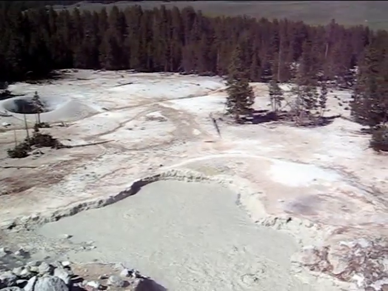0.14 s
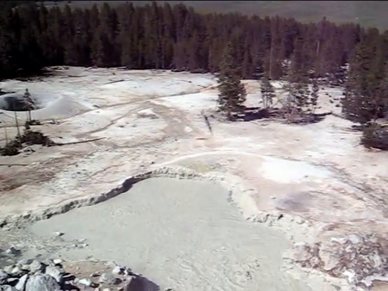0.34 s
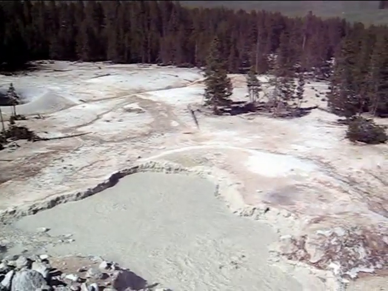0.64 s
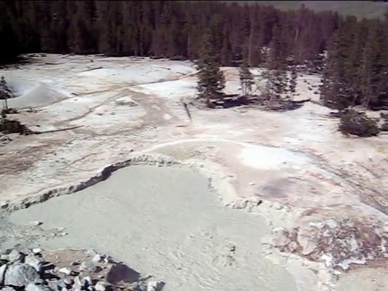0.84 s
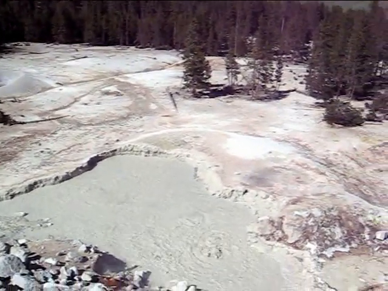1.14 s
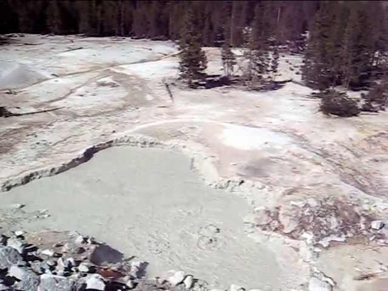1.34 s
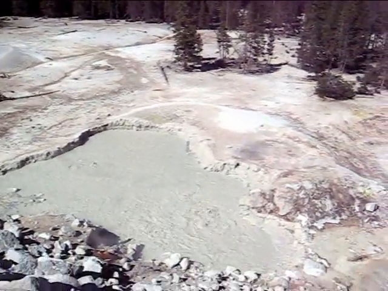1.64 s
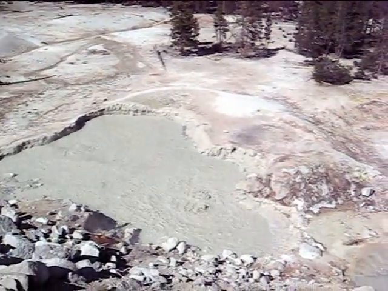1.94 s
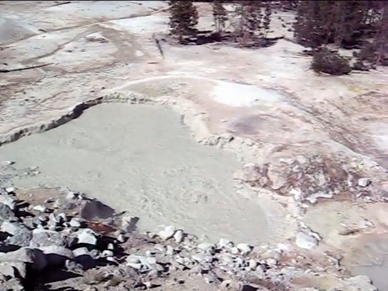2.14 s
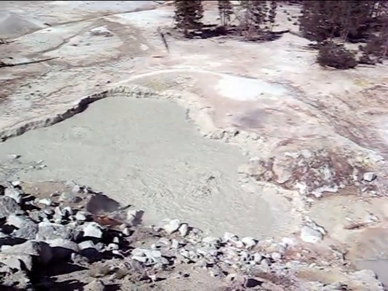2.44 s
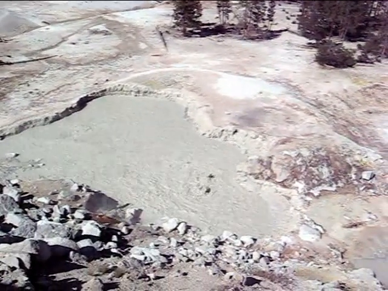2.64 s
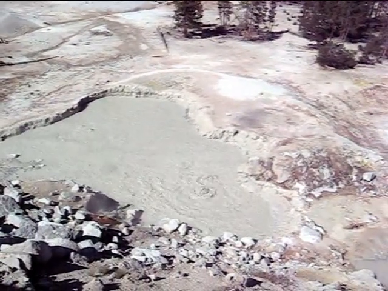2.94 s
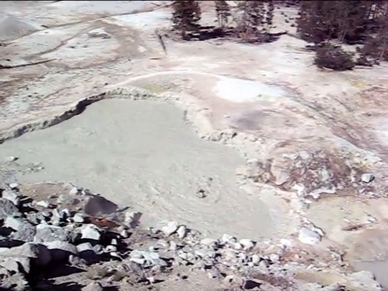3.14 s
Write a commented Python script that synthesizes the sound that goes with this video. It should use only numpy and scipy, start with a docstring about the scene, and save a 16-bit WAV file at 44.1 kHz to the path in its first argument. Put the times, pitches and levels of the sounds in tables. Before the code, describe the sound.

A thermal mud pool churns and hisses outdoors in a dense wash of small bubbles. Beneath it a low engine drone slows, then picks up and grows louder, while light wind rumbles on a dull microphone.

```python
"""A thermal mud pool churns and hisses outdoors, a dense wash of small bursts with no pop standing out.
From the start, light wind rumbles on a small, dull microphone and a low drone sits under the mud,
most likely a vehicle's engine out of sight. The engine slows, then picks up just before the first second
as a thin hum fades away. It booms in its exhaust, eases back, and booms again after two seconds."""
import sys
import numpy as np
from scipy import signal
from scipy.io import wavfile

SR = 44100
rng = np.random.default_rng(int(sys.argv[2]) if len(sys.argv) > 2 else 0)


def inscribe(sig):
    """Save sig as 16-bit PCM at rate SR to the path in sys.argv[1].

    A 1-D sig is mono; a 2-D sig holds one channel per row.
    Samples are clipped to [-1, 1] before scaling.
    """
    pcm = np.round(np.clip(np.atleast_2d(sig).T, -1, 1) * 32767)
    wavfile.write(sys.argv[1], SR, pcm.astype(np.int16))


N = 144648

# Engine roughness. Each row: time in seconds, gain in dB on the uneven tones and the gas noise.
STRAIN = [(0, -4.5), (.4, -2.5), (.68, -1), (1.05, -1), (1.3, -3.5), (1.45, 4.5), (1.87, 3.5), (2.05, 2),
          (2.2, -4), (2.75, -1.5), (3.05, -2), (3.28, -0.5)]
WAVER_DB, WAVER_PER_S = 1.5, 2  # slow level wobble of the uneven tones and the hum


def from_db(db):
    """Decibels to gain."""
    return 10 ** (np.asarray(db) / 20)


def rms_one(x):
    """Scale to unit power."""
    return x / np.sqrt(np.mean(x ** 2) + 1e-20)


def in_time(rows):
    """Turn rows of breakpoints, time first, into one automation curve per remaining column."""
    times, *columns = np.transpose(rows)
    return [np.interp(np.arange(N) / SR, times, column) for column in columns]


def at_hz(spectrum, hz):
    """Read a spectrum's level in dB along a log-frequency axis."""
    freqs, db = np.transpose(spectrum)
    return np.interp(np.log(hz), np.log(freqs), db)


def drift(rate):
    """Smooth random modulation with a spread of 1; a higher rate wanders faster."""
    hop, run_in = 40, 2000
    pole = np.exp(-2 * np.pi * hop * rate / SR)
    noise = rng.standard_normal(N // hop + run_in + 2)
    slow = signal.lfilter([1], [1, -2 * pole, pole * pole], noise)[run_in:]
    return np.interp(np.arange(N) / hop, np.arange(len(slow)), rms_one(slow))


def swell(start_s, rise_s):
    """A soft envelope that peaks at 1 after rise_s and dies away."""
    age = np.clip((np.arange(N) / SR - start_s) / rise_s, 0, 20)
    return age * np.exp(1 - age)


def band_noise(low_hz, high_hz, order=3):
    """Steady noise in one band, at unit power."""
    sos = signal.butter(order, [low_hz, high_hz], "band", fs=SR, output="sos")
    return rms_one(signal.sosfilt(sos, rng.standard_normal(N + SR // 4))[-N:])


def wash(spectrum, flicker_db, rate, bands):
    """A bed of adjoining noise bands that flicker partly together, partly alone, at unit power."""
    edges = np.geomspace(spectrum[0][0], spectrum[-1][0], bands + 1)
    together = drift(rate)
    out = 0
    for low, high in zip(edges, edges[1:]):
        db = at_hz(spectrum, np.sqrt(low * high)) + flicker_db * (0.55 * together + drift(rate))
        out = out + from_db(db) * np.sqrt(high - low) * band_noise(low, high)
    return rms_one(out)


def grains(spectrum, per_s, cycles, spread_db, pitches):
    """A cloud of tiny bursts, each a click ringing at one pitch within the spectrum, at unit power."""
    low_hz, high_hz = spectrum[0][0], spectrum[-1][0]
    sizes = from_db(spread_db * np.minimum(rng.exponential(1, N), 4)) * rng.choice([-1, 1], N)
    clicks = sizes * (rng.random(N) < per_s / SR)
    pitch_index = rng.integers(0, pitches, N)
    out = 0
    for k, hz in enumerate(np.geomspace(low_hz, high_hz, pitches)):
        pole = np.exp(-np.log(1000) * hz / (cycles * SR))  # 60 dB down after `cycles` periods
        feedback = [1, -2 * pole * np.cos(2 * np.pi * hz / SR), pole * pole]
        ring = signal.lfilter([1, 0, -1], feedback, clicks * (pitch_index == k) + 1e-18)
        out = out + from_db(at_hz(spectrum, hz)) * hz * ring
    lowpass = signal.butter(4, high_hz * 0.88, fs=SR, output="sos")
    return rms_one(signal.sosfilt(lowpass, out))


def mud_pool():
    """Sloshing, churning mud full of small bursts, under hissing steam and fine spatter."""
    # The pool's vigour. Each row: time in seconds, then faders in dB for slosh, churn and hiss.
    vigour = [(0, -29.5, -25, -39), (.06, -33.5, -31.5, -38), (.11, -35, -26.5, -37),
              (.18, -31, -30.5, -37.7), (.25, -34, -29.5, -39), (.3, -31, -30, -38.5),
              (.4, -33.5, -31, -40), (.68, -32.5, -30.5, -37.5), (.81, -35.5, -31.5, -41),
              (.86, -33, -33.5, -40.5), (.98, -36.5, -32.5, -42), (1.12, -36.5, -32.5, -40),
              (1.33, -36.5, -33.5, -41.5), (1.5, -36.5, -32, -39), (1.57, -32.5, -30.5, -38),
              (1.66, -33, -31.5, -37.5), (1.78, -35, -29, -38), (1.95, -36.5, -30.5, -40),
              (2.15, -35, -32.5, -40.5), (2.34, -38.5, -36.5, -45), (2.6, -37, -35.7, -41.5),
              (2.78, -40, -36, -42), (3.08, -37.5, -33.5, -39), (3.28, -36, -35.5, -42)]
    # The colour of each layer. Each row: frequency in Hz, relative spectral density in dB.
    slosh_colour = [(260, 0.5), (310, 0), (390, -2), (500, 0), (600, 0.5)]
    churn_colour = [(600, 0.5), (700, 0.5), (830, 1.5), (950, -3.5), (1120, -6), (1560, -5), (1800, -10.5)]
    hiss_colour = [(1800, 1.5), (2230, -1.5), (2600, -1.5), (3300, -3.5), (4360, -8.5), (5300, -15),
                   (6100, -20.5), (6900, -30.5), (7600, -41)]
    spatter_colour = [(1800, -2), (3200, -3), (4500, -6.5), (5300, -16)]
    slosh = from_db(-0.8) * wash(slosh_colour, flicker_db=0.1, rate=20, bands=6)
    churn = from_db(-0.73) * wash(churn_colour, flicker_db=0.5, rate=16, bands=12)
    bursts = from_db(-10) * grains(churn_colour, per_s=200, cycles=24, spread_db=2, pitches=22)
    hiss = wash(hiss_colour, flicker_db=1.5, rate=35, bands=16)
    spatter = from_db(-10.5) * grains(spatter_colour, per_s=790, cycles=1.1, spread_db=6.5, pitches=12)
    slosh_gain, churn_gain, hiss_gain = from_db(in_time(vigour))
    return slosh_gain * slosh + churn_gain * (churn + bursts) + hiss_gain * (hiss + spatter)


def wind():
    """Lumpy rumble on the microphone, rising and falling with the gusts."""
    # The rumble's colour. Each row: frequency in Hz, relative spectral density in dB.
    colour = [(16, -19.5), (30, -8), (48, -4.5), (75, -4), (100, -3), (180, -3.5), (270, -9)]
    # The wind's strength. Each row: time in seconds, level in dB.
    gusts = [(0, -35), (.35, -32), (.5, -40), (.62, -31), (.85, -39.5), (1.0, -39), (1.2, -36),
             (1.55, -37.5), (1.9, -41.5), (2.7, -36.5), (3.0, -35), (3.28, -39)]
    gust_db, = in_time(gusts)
    return from_db(gust_db) * wash(colour, flicker_db=2.0, rate=21, bands=8)


def engine():
    """A firing tone and its sub-octave; a neighbouring tone beats with it, uneven firing roughens it."""
    # The drone. Each row: time in seconds, firing rate in Hz, firing tone in dB, sub-octave in dB.
    drone = [(0, 144, -47, -34), (.2, 143.6, -35.5, -35.5), (.36, 135, -40, -31), (.55, 122.8, -44, -35),
             (.68, 117.4, -41, -29.5), (.78, 130.3, -24.5, -27), (.88, 143, -20, -33),
             (1.02, 155.1, -23, -35), (1.32, 154.6, -23, -36), (1.53, 164.5, -29, -39),
             (1.66, 167.6, -26.5, -38.5), (1.9, 158.3, -25.5, -44), (2.1, 151, -22, -37),
             (2.35, 146.8, -19.5, -40), (2.78, 148.7, -19.5, -40.5), (3.02, 152.1, -25.5, -34),
             (3.28, 155.3, -23, -33)]
    # The tone just under the firing tone, for one throb a cycle. Each row: time in seconds, level in dB.
    throb = [(0, -41), (.9, -47), (1.05, -38), (1.3, -38.5), (1.45, -39), (1.85, -33), (2.05, -35),
             (2.25, -46), (2.7, -45), (3.05, -33), (3.28, -35)]
    # Weaker tones from uneven firing. Each row: multiple of the engine's cycle rate, base level in dB.
    uneven_tones = [(2.5, -49), (3, -53), (6.5, -54.5), (7.5, -52), (9, -46), (10.5, -47.5), (11, -52.5),
                    (12, -46), (13, -51.5), (14, -51.5), (16, -48)]
    cylinders = 8
    firing_hz, firing_db, octave_db = in_time(drone)
    strain_db, = in_time(STRAIN)
    throb_db, = in_time(throb)
    phase = 2 * np.pi * (np.cumsum(firing_hz) / SR + rng.uniform(0, cylinders))
    out = from_db(firing_db) * np.cos(phase) + from_db(octave_db) * np.sin(phase / 2)
    out = out + from_db(throb_db) * np.cos(phase - phase / cylinders)
    for multiple, db in uneven_tones:
        ratio = multiple / cylinders
        offset = rng.uniform(0, 2 * np.pi)
        level_db = db + exhaust_lift_db(ratio * firing_hz) + strain_db + WAVER_DB * drift(WAVER_PER_S)
        out = out + from_db(level_db) * np.cos(ratio * phase + offset)
    return np.sqrt(2) * out


def exhaust_lift_db(hz):
    """The boost a tone gets as it passes through the exhaust's resonances."""
    # Each row: centre in Hz, half width in Hz, peak boost in dB.
    resonances = [(144, 20, 9), (232, 31, 3.5)]
    return sum(db / (1 + ((hz - centre) / half_width) ** 2) for centre, half_width, db in resonances)


def exhaust():
    """Gas noise rings in the pipe, swelling as the engine runs rougher."""
    # The pipe's ringing bands. Each row: centre in Hz, width in Hz, base level in dB.
    pipe = [(56.3, 33, -45), (143, 7.2, -46), (226.4, 52, -42)]
    strain_db, = in_time(STRAIN)
    gas = sum(from_db(db) * band_noise(hz - width / 2, hz + width / 2, order=2) for hz, width, db in pipe)
    return from_db(strain_db) * gas


def hum():
    """A thin low tone that wavers in level and fades out as the engine picks up."""
    hz, level_db, end_s, fade_s = 146.2, -34, 0.81, 0.15
    t = np.arange(N) / SR
    fade = np.clip((end_s - t) / fade_s, 0, 1)
    gain = from_db(level_db + WAVER_DB * drift(WAVER_PER_S))
    return np.sqrt(2) * gain * fade * np.sin(2 * np.pi * hz * t + rng.uniform(0, 2 * np.pi))


def plops():
    """Larger bubbles, half buried in the churn: each swells, rings briefly and bends slightly upward."""
    # The biggest gulp low and slowly.
    # Each row: start in seconds, pitch in Hz, peak level in dB, rise in seconds.
    bubbles = [(.055, 223.6, -28, 0.023), (.095, 398, -29, 0.011), (.125, 543, -30, 0.011),
               (.15, 1212, -28.5, 0.0081), (.205, 560, -25.5, 0.0059), (.228, 846, -27.5, 0.007),
               (.345, 231, -27.5, 0.0089), (.415, 217, -24, 0.017), (.62, 142, -24.5, 0.019),
               (.682, 510, -27, 0.0077), (.785, 235, -26.5, .018), (.685, 1536, -33.5, .005),
               (.812, 1024, -29, 0.0041), (1.117, 1135, -31, 0.0049), (1.55, 534, -30.5, 0.0048),
               (1.697, 830, -23.5, .0065), (1.774, 434, -28, 0.0078), (1.94, 816.4, -24.5, 0.0068),
               (2.675, 502.4, -31.5, .007), (2.697, 1245, -32, 0.0053), (3.2, 758, -29, 0.0059)]
    glide_per_s = 0.43  # as a fraction of the starting pitch
    out = 0
    for start_s, hz, db, rise_s in bubbles:
        age = np.arange(N) / SR - start_s
        phase = 2 * np.pi * hz * age * (1 + glide_per_s * age / 2)
        out = out + from_db(db) * swell(start_s, rise_s) * np.sin(phase)
    return out


def spits():
    """Flecks of mud, short bright puffs of noise a little stronger than the spatter."""
    # Each row: start in seconds, level at the crest in dB, rise in seconds.
    flecks = [(.163, -39, .004), (.2, -38.5, 0.0066), (.806, -38, 0.0013), (0.934, -37.5, .002),
              (1.097, -42, 0.0035), (1.117, -36, .004), (1.14, -41, 0.0023), (1.244, -40, 0.0028),
              (1.517, -37, 0.0028), (1.565, -38, 0.0041), (1.634, -39.5, .003), (1.78, -38.5, .003),
              (2.114, -41, .003), (2.261, -39, 0.0021), (3.026, -36.5, 0.0027), (3.205, -37, .0015)]
    envelope = sum(from_db(db) * swell(start_s, rise_s) for start_s, db, rise_s in flecks)
    return envelope * band_noise(low_hz=1500, high_hz=4730, order=4)


def scene():
    """Pool, engine, hum and wind mixed to mono."""
    return (mud_pool() + plops() + spits() + engine() + exhaust() + hum() + wind())[None]


def record(dry):
    """The recorder cuts the treble steeply, dulling the whole mix."""
    stop_hz, stop_db = 8100, 50
    return signal.sosfilt(signal.cheby2(12, stop_db, stop_hz, fs=SR, output="sos"), dry)


dry = scene()
out = record(dry)
inscribe(out)
```